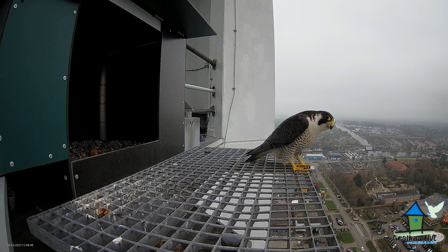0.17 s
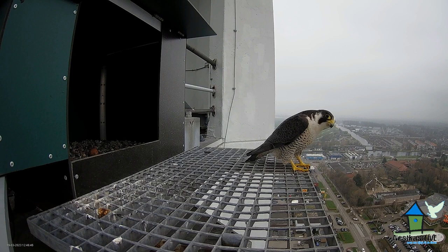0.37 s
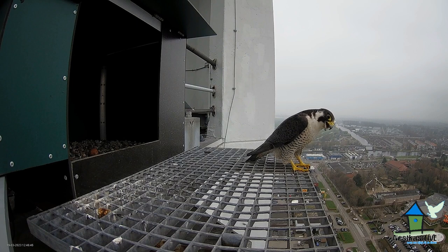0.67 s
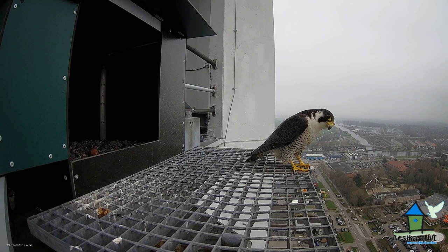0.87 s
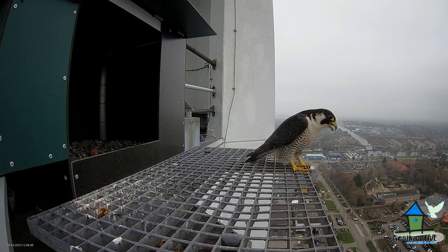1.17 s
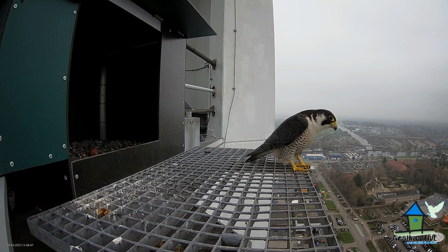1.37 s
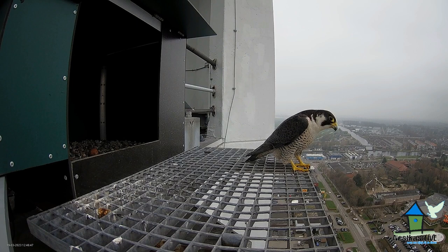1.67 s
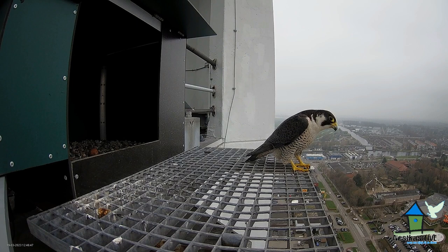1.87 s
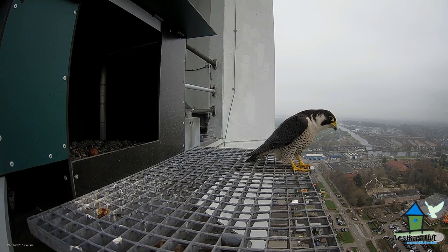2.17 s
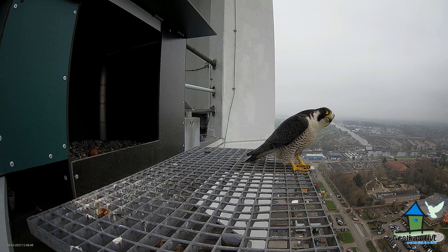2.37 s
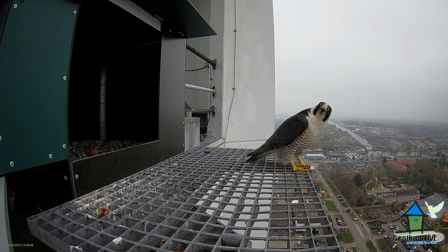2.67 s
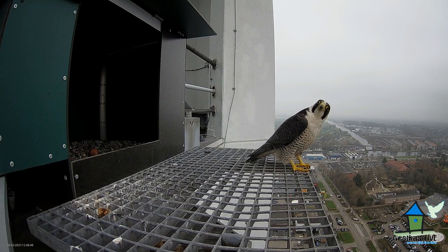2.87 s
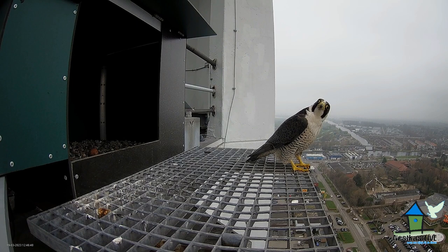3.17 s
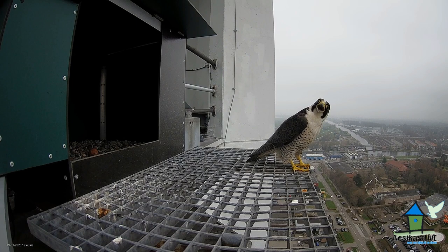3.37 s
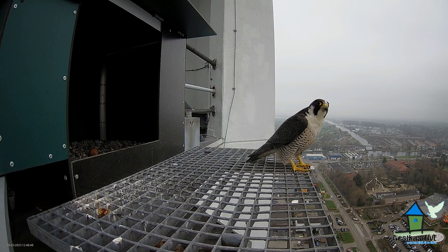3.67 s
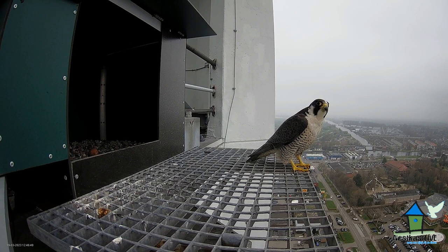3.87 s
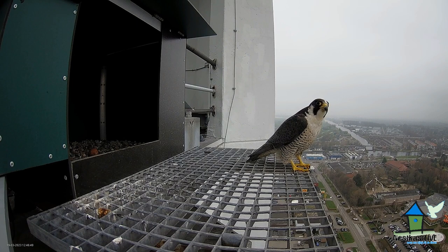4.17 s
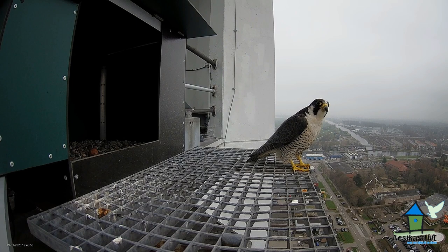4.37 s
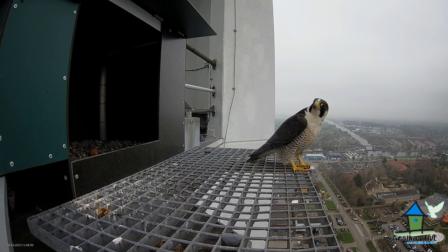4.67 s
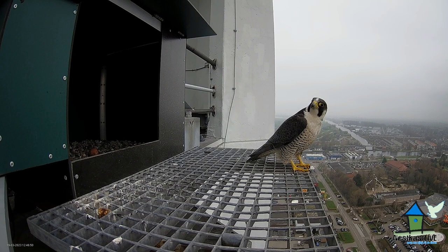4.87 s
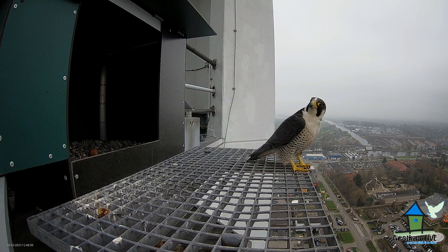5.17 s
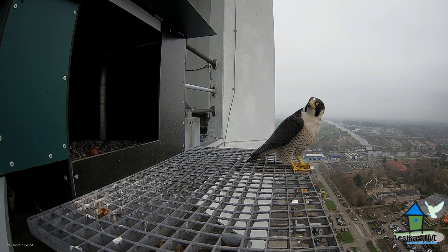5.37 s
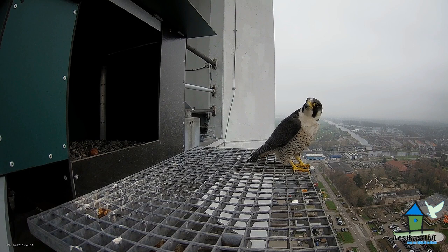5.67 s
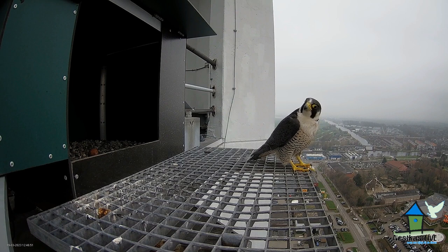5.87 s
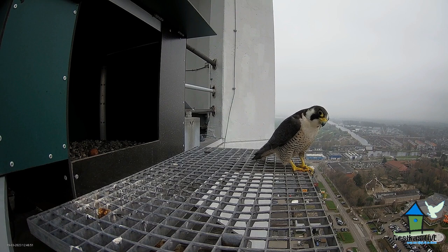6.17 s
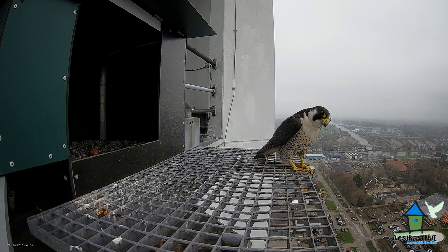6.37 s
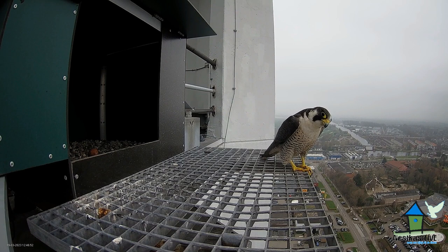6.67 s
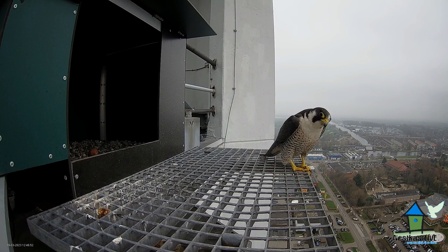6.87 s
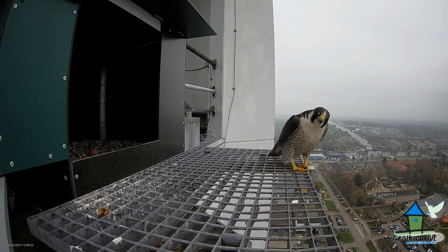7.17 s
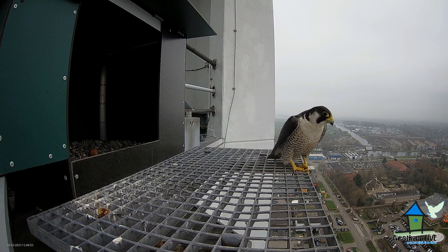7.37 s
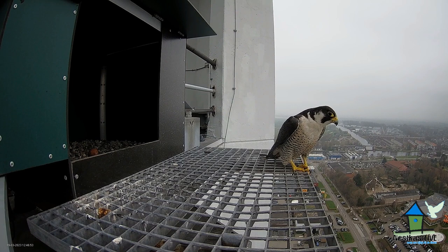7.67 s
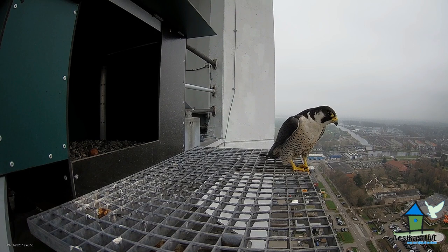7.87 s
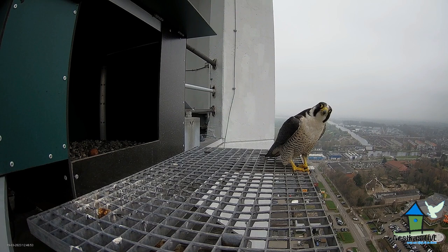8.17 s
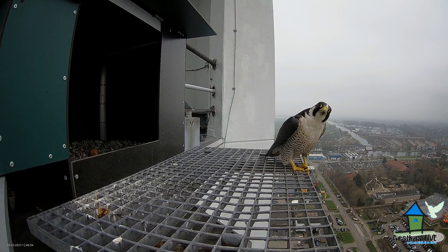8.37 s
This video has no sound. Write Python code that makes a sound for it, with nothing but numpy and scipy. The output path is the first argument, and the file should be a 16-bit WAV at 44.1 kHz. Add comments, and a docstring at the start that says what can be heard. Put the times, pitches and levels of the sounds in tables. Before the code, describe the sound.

A falcon near the microphone on a high tower ledge gives ten clipped calls, each a thin rising whistle snapping into a loud chip and a short rough croak. After two early calls and a pause comes one more, then a steady series about every half second, ending with a soft upward cluck. Faint echoes return from the wall; wind thumps low over distant town hum.

```python
"""Falcon calling on a tower ledge

A falcon close to a nest camera gives ten "ee-chup" calls and one low cluck, from a two-sided syrinx.
Two sine voices rise in a whistle, a loud chip falls, and clapping pulses ring the throat in a croak.
Decaying noise echoes the voice off the tower; a faint dry tick sounds on the ledge.
Wind eddies thump the microphone over the shaped-noise hiss of a far town, where a small bird chirps."""
import sys
import numpy as np
from scipy import signal
from scipy.fft import rfft, irfft
from scipy.io import wavfile
from scipy.ndimage import uniform_filter1d

SR = 44100
rng = np.random.default_rng(int(sys.argv[2]) if len(sys.argv) > 2 else 0)


def persist_wave(psi):
    """Save psi, clipped to +-1, as 16-bit WAV."""
    counts = np.round(np.clip(psi, -1, 1) * 32767).astype(np.int16)
    wavfile.write(sys.argv[1], SR, np.atleast_2d(counts).T)


N = 376158
TIME = np.arange(N) / SR
BAND_HZ = 7250  # upper edge of the camera's band, and of the low voice's overtones


# The calls. A strained call has wider pitches, a brighter chip and a higher croak; a swell is a
# voice's change of level on its way to the chip:
# (chip time [s], whistle length [s], whistle top [Hz], chip end [Hz], chip length [s],
#  whistle level [dB], its swell [dB], its overtone [dB], upper voice level [dB], its swell [dB],
#  croak level [dB], strain [0-1])
CALLS = [ (0.7073, .042, 2826, 2536, 0.012, -20.5, -3, -11.5, -46.5, 29, -15, 0.94),
         (1.2831, 0.042, 2810, 2330, 0.012, -25.5, -12, -19, -36.5, -1.5, -22.5, 0.19),
         (2.7716, 0.039, 2760, 2485, .012, -25, -2, -23.5, -30, 6.5, -19, .8),
         (3.3997, .039, 2690, 2294, 0.013, -24, -4, -24.5, -32.5, 6, -20.5, 0.14),
         (4.0247, 0.038, 2624, 2285, .0125, -25.5, 1, -18.5, -34.5, -1, -19, 0.15),
         (4.5668, .041, 2648, 2300, .011, -24, 0.5, -17, -33, 8, -20, 0.16),
         (5.052, .043, 2672, 2307, .015, -21.5, 0.5, -21.5, -33.5, 1, -19.5, .05),
         (5.5895, 0.042, 2674, 2324, 0.012, -22, 2.5, -26, -31.5, 2.5, -20, 0.1),
         (6.072, 0.044, 2782, 2508, 0.0084, -21.5, -23.5, -19, -30.5, 12.5, -20, 1),
         (6.6, .047, 2730, 2346, 0.011, -20.5, -3, -11, -58, 4.5, -21, 0.19)]
# The closing cluck: (time [s], pitch [Hz], level [dB], brightness [dB])
CLUCK_GLIDE = [(8.015, 465, -44, -8), (8.022, 488, -17, -3), (8.029, 543, -15, -1), (8.031, 705, -15.5, 2),
               (8.041, 739, -14.5, -7.5), (8.046, 963, -29, -12), (8.051, 1040, -22.5, -25),
               (8.060, 1070, -29, -13), (8.066, 1040, -54, -20)]
# A dip around 6 kHz in the calls' treble: (frequency [Hz], gain [dB])
CALL_DIP_RESPONSE = [(5300, 0), (5750, -6.5), (6150, -6), (6600, -1.5), (7000, 4)]


def falcon():
    """Source and filter: the syrinx makes the calls and a cluck sliding upward; their treble dips around 6 kHz."""
    out = np.zeros(N)
    t = np.arange(-.06, .08, 1 / SR)
    for chip_s, *shape in CALLS:
        add(out, chup(t, *shape), chip_s + t[0])
    s, *columns = np.transpose(CLUCK_GLIDE)
    cluck_t = np.arange(s[0], s[-1], 1 / SR)
    hz, db, bright_db = (np.interp(cluck_t, s, column) for column in columns)
    cluck = low_voice(hz, jitter=0.0104, rasp=0.67, shimmer_db=-0.6, bright_db=bright_db)
    add(out, undb(db) * cluck, s[0])
    return resonate(out, CALL_DIP_RESPONSE)


# the two sides of the syrinx whistle on separate pitches; each starts at a share of its top pitch
LOWER_START, UPPER_START = .875, .87
UPPER_RATIO, STRAIN_RATIO = 1.63, 0.065  # upper over lower top pitch, and what full strain adds
CROAK_HZ, STRAIN_CROAK_HZ = 535.6, 275.4  # where the croak starts, and what full strain adds
CHIP_DB = -10  # the same in every call
OVERTONE_DB, STRAIN_OVERTONE_DB = -12.5, 3  # the chip's overtone, and what full strain adds
WHISTLE_RISE_S, WHISTLE_FULL_S = .002, .006  # from its start to half, then to full amplitude


def chup(t, lead, top_hz, end_hz, length, early_db, swell_db, edge_db,
         upper_db, upper_swell_db, croak_db, strain):
    """Tension sets pitch: it builds, lets go in a downward chip at t = 0, and the voice breaks."""
    late_db, upper_late_db = early_db + swell_db, upper_db + upper_swell_db
    upper_top_hz = top_hz * (UPPER_RATIO + STRAIN_RATIO * strain)

    # the lower voice climbs, then drops quickly as the chip bursts out
    climb = np.interp(t, [-lead, -.006], [LOWER_START * top_hz, top_hz])
    drop = (top_hz - end_hz) * (1 - np.exp(-np.maximum(t + 0.0011, 0) / 0.0044))
    lower = turn(climb - drop, 0.0085, 700)
    whistle = fade(t, [
        (-lead - .006, early_db - 27), (WHISTLE_RISE_S - lead, early_db - 6.5),
        (WHISTLE_FULL_S - lead, early_db), (-.024, early_db),
        (-.012, late_db), (0, late_db - 4), (.004, late_db - 23)])
    whistle = whistle * undb(1.7 * walk(len(t), 180))
    chip = undb(CHIP_DB) * fade(t, [
        (-.003, -28), (0, -6), (.002, 0), (length - .001, -.5), (length + .002, -11), (length + 0.0058, -40)])
    overtone = undb(OVERTONE_DB + STRAIN_OVERTONE_DB * strain) * fade(t, [
        (-.005, -28), (0, -3), (.003, .5), (.008, -4.5), (length + 0.0027, -15), (length + 0.017, -38)])
    tone = (whistle + chip) * np.sin(lower)
    tone -= (undb(edge_db) * whistle + overtone) * np.cos(2 * lower)
    tone += (whistle + chip) * undb(-30) * np.sin(3 * lower)

    # the upper voice sags and stops as the chip begins
    upper_pitch = upper_top_hz * np.interp(t, [-lead, -.014, -.007, .002], [UPPER_START, 1, .995, .865])
    upper = turn(upper_pitch, 0.0099, 700)
    upper_gain = fade(t, [
        (-lead - .005, upper_db - 27), (-lead + 0.0015, upper_db - 0.5), (-.024, upper_db - 3),
        (-.009, upper_late_db), (0, upper_late_db + 2), (.005, upper_late_db - 26)])
    upper_gain = upper_gain * undb(2 * walk(len(t), 200) + 2 * walk(len(t), 1100))

    # the two voices push on each other, which adds sum and difference tones
    mixing = undb(-18) * np.sin(upper + lower)
    mixing += undb(-30.5) * np.sin(2 * lower - upper)
    mixing += undb(-22.5) * np.sin(2 * (upper - lower))
    tone += upper_gain * (np.sin(upper) + mixing * np.clip(-t / 0.013, 0, 1))

    # air rushes through, with a burst at the instant when the chip starts
    air = undb(-30) * chip + undb(-35) * whistle + fade(t, [(-.008, -52), (0, -27), (.008, -51.5)])
    rush = air * noise(len(t), [
        (500, -31), (2000, -15.5), (3300, 0.5), (5300, -4.5), (6000, -10), (7200, -13.5)])

    # the croak sinks in pitch and grows duller as it dies away
    since_break = np.clip(t - length, 0, .04)
    croak_pitch = (CROAK_HZ + STRAIN_CROAK_HZ * strain) * np.exp(-since_break / .032)
    croak = low_voice(croak_pitch, jitter=0.022, rasp=0.42, shimmer_db=2.5)
    dull = signal.sosfilt(signal.butter(2, 2400, fs=SR, output="sos"), croak)
    croak = dull + np.exp(-since_break / 0.038) * (croak - dull)
    croak = croak * fade(t - length, [
        (-.003, -28.5), (0, -2), (.004, 1.5), (.013, -2.5), (.024, -8.5), (.034, -32), (.05, -47)])
    return tone + rush + undb(croak_db) * croak


# Peaks and valleys of the throat in the low register: (frequency [Hz], gain [dB])
THROAT_RESPONSE = [(200, -11.5), (500, -1.5), (750, 0), (950, 3.5), (1300, -9), (1800, 6.5), (2350, -5),
                   (2680, -19.5), (3080, 6), (3350, -8), (3650, 1.5), (4100, -21), (5000, -14.5),
                   (7100, -38.5)]


def low_voice(hz, jitter, rasp, shimmer_db, bright_db=0):
    """Pulse excitation: the slack syrinx claps once a cycle, with puffs of air, and rings the throat."""
    phase = turn(hz, jitter, 600)
    # each clap is spread over part of the cycle: the higher overtones lag
    overtones = sum(np.cos(k * phase - .25 * k ** 2) * (k * hz < BAND_HZ) for k in range(2, 24))
    puffs = (1 + np.cos(phase)) * rng.standard_normal(len(hz))
    claps = np.cos(phase) + undb(bright_db) * (overtones + rasp * puffs)
    claps = claps * undb(shimmer_db * walk(len(hz), 500))
    sound = resonate(claps, THROAT_RESPONSE)
    # the level is evened out, for the caller to shape
    return sound / np.sqrt(uniform_filter1d(sound ** 2, size=400) + 1e-9)


TAIL_T60_S = .55  # time for the tower's echo to fall by 60 dB
SCATTER_S = .047  # when the scatter from the far side of the ledge returns
# Spectrum of the diffuse echo: (frequency [Hz], relative level [dB per Hz])
ECHO_COLOUR = [(300, -13.5), (1500, -7), (2500, -4), (3500, -4), (5000, -6.5), (5220, -7.5), (5500, -3.5),
               (7100, -3), (10000, -4)]
# The narrow band in which the metalwork rings: (frequency [Hz], relative level [dB per Hz])
METAL_BAND = [(4400, -40), (4700, -7), (4950, -8), (5200, 1), (5450, -5.5), (5800, -40.5)]


def tower(x, near_db=-21, near_t60=.05, wall_db=-33, wall_s=0.044, scatter_db=-32, tail_db=-32,
          metal_db=-40, metal_t60=0.39):
    """Reverberation by convolution: nest box and ledge scatter, a wall answers, metalwork rings on."""
    t = TIME[:SR]

    def ring(start_s, t60, colour=ECHO_COLOUR):
        """Exponential decay: dense reflections of unit total energy that start late and die away."""
        decay = np.exp(-np.log(1000) * np.abs(t - start_s) / t60)
        h = noise(len(t), colour) * (t > start_s) * decay
        return h / np.sqrt(np.sum(h ** 2))

    response = undb(near_db) * ring(0.011, near_t60)
    response += undb(scatter_db) * ring(SCATTER_S, .17)
    response += undb(tail_db) * ring(0.005, TAIL_T60_S)
    response += undb(metal_db) * ring(.011, metal_t60, METAL_BAND)
    response[int(wall_s * SR)] += undb(wall_db)
    return x + signal.fftconvolve(x, response)[:N]


TICK_S, TICK_DB, TICK_DECAY_S = 5.166, -33.5, 0.0013
# Filtering of the tick: (frequency [Hz], gain [dB])
TICK_RESPONSE = [(1500, -23), (3300, -2), (4000, 9), (5000, -14), (7000, -35)]


def tick():
    """Impulsive excitation: a quickly dying noise burst gives one faint, dry tick on the ledge."""
    out, t = np.zeros(N), TIME[:SR // 50]
    burst = rng.standard_normal(len(t)) * np.exp(-t / TICK_DECAY_S)
    add(out, undb(TICK_DB) * resonate(burst, TICK_RESPONSE), TICK_S)
    return out


# lesser eddies: level over the wind and its spread, middle swing rate and its spread
EDDY_DB, EDDY_SCATTER_DB, EDDY_HZ, EDDY_OCTAVES = 7, 4.5, 125, .55
# The strongest eddies that hit the microphone: (time [s], swing level [dB], swing rate [Hz])
STRONG_EDDIES = [(0.527, -23, 176), (0.715, -16, 154), (1.389, -18.5, 88), (3.18, -18.5, 67),
                 (4.315, -20, 74), (4.442, -14.5, 163), (4.458, -12.5, 142), (4.627, -16, 180),
                 (4.712, -21.5, 60.5), (5.374, -13.5, 79), (5.847, -18.5, 105), (6.322, -23.5, 87),
                 (6.954, -23, 129.8), (7.372, -12.5, 125), (7.428, -20, 151), (7.605, -20.5, 174.6),
                 (7.657, -16.5, 97.8), (7.69, -17, 94), (7.917, -18, 92), (8.101, -21.5, 97),
                 (8.117, -20, 96)]
# Strength of the wind: (time [s], level before the overall wind gain [dB])
WIND_STRENGTH = [(0.0, -57), (0.28, -58), (0.59, -42), (1.14, -54), (1.37, -43), (2.09, -59), (2.97, -52.5),
                 (3.14, -44.5), (3.92, -52.5), (4.56, -39), (4.92, -47.5), (5.8, -42), (6.1, -49),
                 (7.29, -46), (7.48, -33.5), (7.74, -38), (7.86, -44), (8.53, -46.5)]
# Spectrum of the rumble: (frequency [Hz], relative level [dB per Hz])
RUMBLE_COLOUR = [(15, 1), (35, 2), (80, 0.5), (150, -9), (250, -14.5), (450, -25), (1000, -47),
                 (3000, -84.5)]


def wind(gain_db=4, count=70):
    """Turbulent pressure: noise rumbles on the microphone; strong and lesser eddies thump it."""
    strength_db = np.interp(TIME, *np.transpose(WIND_STRENGTH)) + gain_db
    flutter_db = 2.8 * walk(N, 35)
    t = np.arange(-.04, .04, 1 / SR)
    strong, lesser = np.zeros(N), np.zeros(N)
    angles = rng.uniform(0, 2 * np.pi, len(STRONG_EDDIES))
    for (s, db, hz), angle in zip(STRONG_EDDIES, angles):
        add(strong, undb(db) * eddy(t, hz, angle), s + t[0])
    places, sizes = rng.random((count, 2)), rng.standard_normal((count, 2))
    for (place, phase), (size, rate) in zip(places, sizes):
        thump = eddy(t, EDDY_HZ * 2 ** (EDDY_OCTAVES * rate), 2 * np.pi * phase)
        add(lesser, undb(EDDY_DB + EDDY_SCATTER_DB * size) * thump, place * TIME[-1])
    rumble = noise(N, RUMBLE_COLOUR) * undb(flutter_db)
    return strong + undb(strength_db) * (rumble + lesser)


def eddy(t, hz, angle):
    """Breakdown of a vortex: one swing of pressure carries finer turbulence at its crests."""
    swing = np.cos(2 * np.pi * hz * t + angle) / np.cosh(hz * t / 0.23)
    fine = noise(len(t), [(200, 2.5), (350, -5.5), (600, -14), (1200, -26.5), (3000, -57)])
    return swing + 0.36 * swing ** 2 * fine


TOWN_DB = -45
# Spectrum of far traffic and air: (frequency [Hz], relative level [dB per Hz])
TOWN_COLOUR = [(30, 0), (90, -6), (140, -6.5), (280, -9), (600, -7.5), (1020, -7), (1300, -12.5),
               (1700, -20), (2200, -24.5), (2650, -26), (3400, -35), (5000, -39.5), (5700, -48.5),
               (7200, -50.5)]
# Far chirps: (time [s], length [s], start pitch [Hz], end pitch [Hz], level before flutter [dB])
FAR_CHIRPS = [(2.02, 0.16, 4620, 4450, -68), (4.82, 0.082, 3870, 3940, -59),
              (7.053, 0.061, 5440, 4850, -66), (8.217, 0.055, 5360, 5170, -68.5)]


def town(swell_db=1.5, waver_db=-69):
    """Superposition of far sources: swelling noise, a wavering whistle and a small bird's gliding chirps."""
    out = noise(N, TOWN_COLOUR) * undb(TOWN_DB + swell_db * walk(N, 0.51))
    # the whistle comes in patches, clearest at first, then sinks into the hiss
    waver = np.sin(turn(2680 * (1 + .03 * walk(N, 16)), .035, 500))
    waver *= np.clip(.6 + walk(N, 14), 0, 1.5)
    sinking_db = np.interp(TIME, [.5, 1.5], [5, -3])
    out += waver * undb(waver_db + sinking_db + 1.7 * walk(N, 15))
    for s, length, start_hz, end_hz, db in FAR_CHIRPS:
        n = int(length * SR)
        glide = np.sin(turn(np.linspace(start_hz, end_hz, n), 0.0038, 400))
        add(out, undb(db + 4 * walk(n, 109)) * np.hanning(n) * glide, s)
    return out


def undb(db):
    """Logarithmic level: decibels to amplitude gain."""
    return 10 ** (np.asarray(db) / 20)


def unit(x):
    """Effective value: scale to rms 1."""
    return x / np.sqrt(np.mean(x ** 2))


def add(out, x, start_s):
    """Superposition: mix x into out from a given time on."""
    i = int(round(start_s * SR))
    out[i:i + len(x)] += x[:len(out) - i]


def walk(n, rate):
    """Random modulation: straight slopes between chance values, rate of them a second, spread near 1."""
    k = max(int(SR / rate), 1)
    steps = np.repeat(rng.standard_normal(n // k + 1), k)
    return 1.48 * uniform_filter1d(steps, k)[:n]


def noise(n, colour):
    """Spectral shaping: noise of rms 1 with a spectrum of (frequency [Hz], level [dB]) points."""
    return unit(irfft(rfft(rng.standard_normal(n)) * gains(n, colour), n))


def turn(hz, jitter, rate):
    """Frequency modulation: the phase of an oscillator whose pitch trembles."""
    return 2 * np.pi * np.cumsum(hz * (1 + jitter * walk(len(hz), rate))) / SR


def fade(t, points):
    """Amplitude envelope: gain along (time [s], level [dB]) points, silent outside them."""
    s, db = np.transpose(points)
    return undb(np.interp(t, s, db, left=-np.inf, right=-np.inf))


def gains(n, colour):
    """Frequency response: (frequency [Hz], level [dB]) points as a gain per bin of an n-point transform."""
    hz, db = np.transpose(colour)
    bin_hz = np.maximum(np.fft.rfftfreq(n, 1 / SR), 1)
    return undb(np.interp(np.log(bin_hz), np.log(hz), db))


def resonate(x, colour, size=1024):
    """Minimum phase: a folded cepstrum gives a causal filter with the given spectrum."""
    cepstrum = irfft(np.log(gains(size, colour)))[:size // 2]
    cepstrum[1:] *= 2
    impulse_response = irfft(np.exp(rfft(cepstrum, size)))
    return signal.fftconvolve(x, impulse_response)[:len(x)]


def scene():
    """Superposition: the falcon with its echo, the tick, the wind and the town."""
    return (tower(falcon()) + tick() + wind() + town())[None]


CONVERTER_HZ, TOP_HZ = 16000, 14500  # centre of the mirroring, and the final upper edge


def record(dry, mirror_db=-54):
    """Band limiting and imaging: the camera's converter leaks a faint mirror image into the treble."""
    band = signal.sosfilt(signal.ellip(10, .2, 60, BAND_HZ, fs=SR, output="sos"), dry)
    mirror = undb(mirror_db) * 2 * np.cos(2 * np.pi * CONVERTER_HZ * TIME) * band
    return signal.sosfilt(signal.ellip(8, .2, 70, TOP_HZ, fs=SR, output="sos"), band + mirror)


dry = scene()
out = record(dry)
persist_wave(out)
```